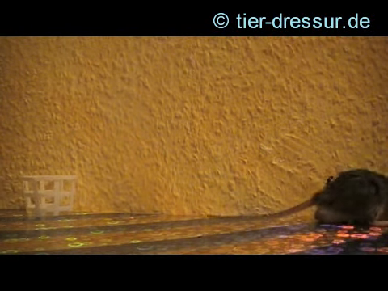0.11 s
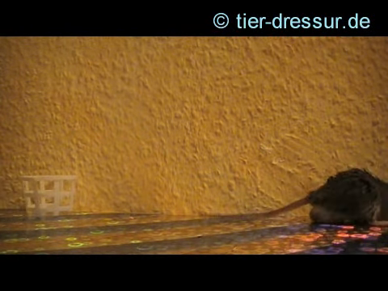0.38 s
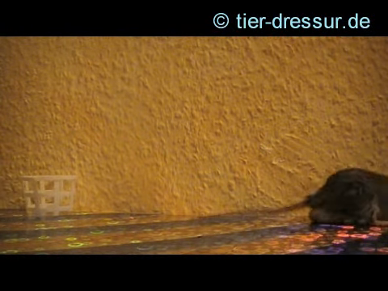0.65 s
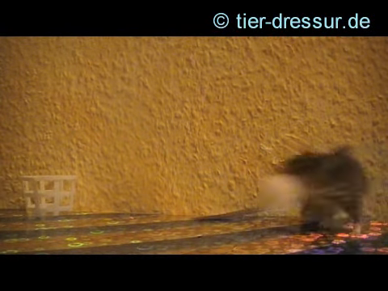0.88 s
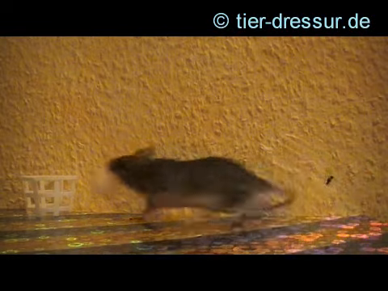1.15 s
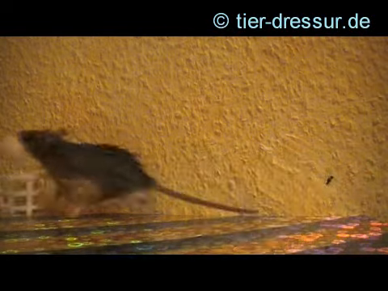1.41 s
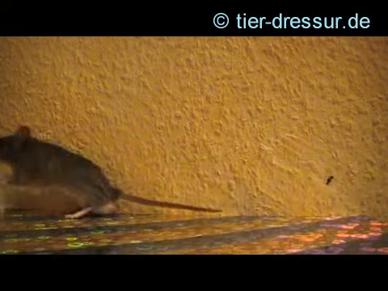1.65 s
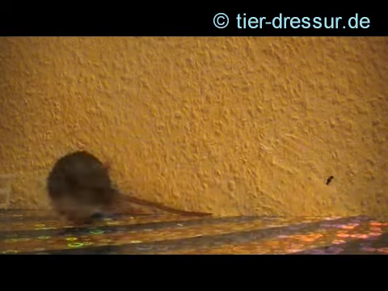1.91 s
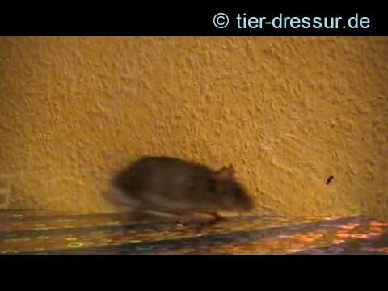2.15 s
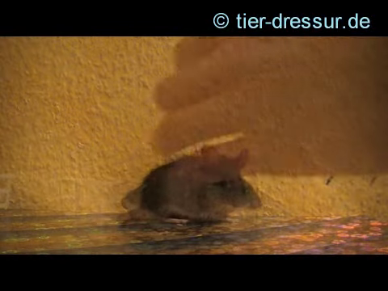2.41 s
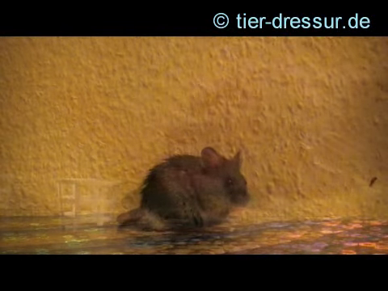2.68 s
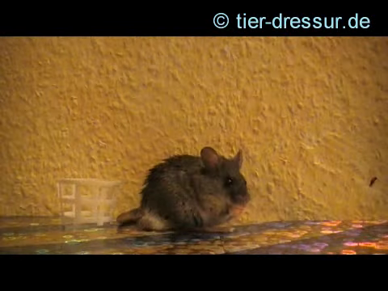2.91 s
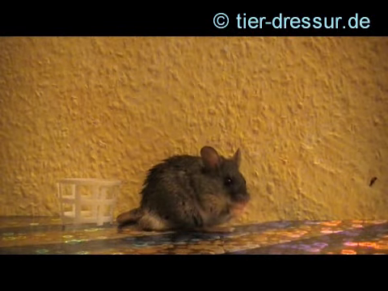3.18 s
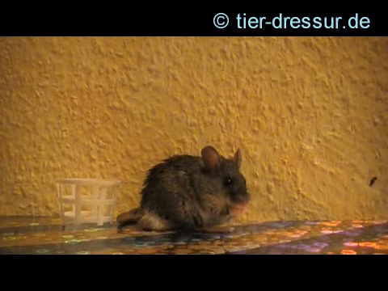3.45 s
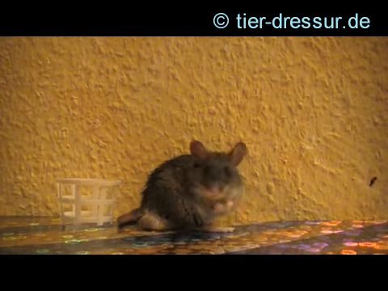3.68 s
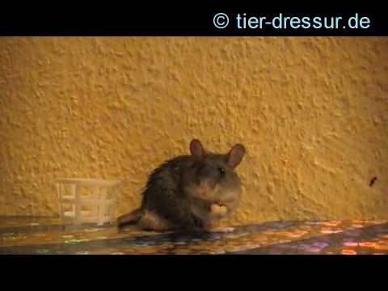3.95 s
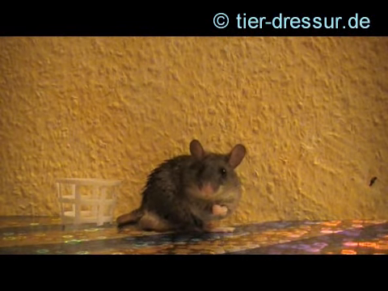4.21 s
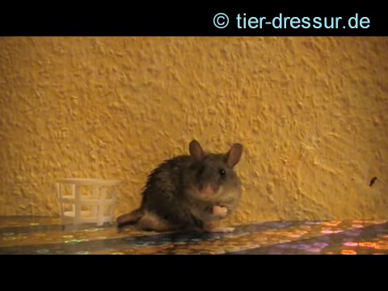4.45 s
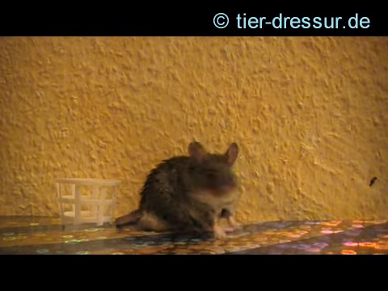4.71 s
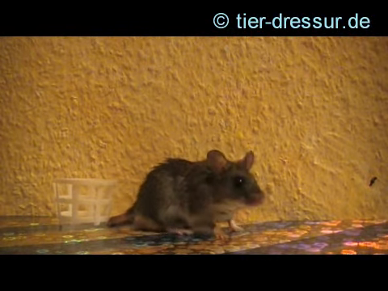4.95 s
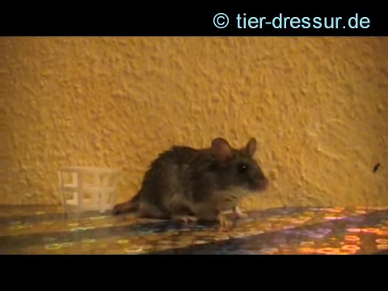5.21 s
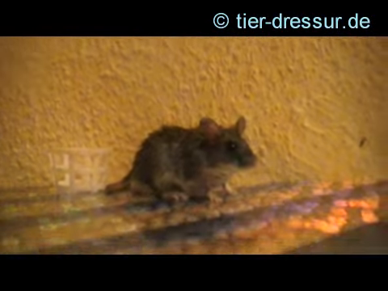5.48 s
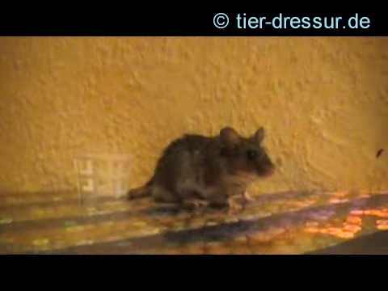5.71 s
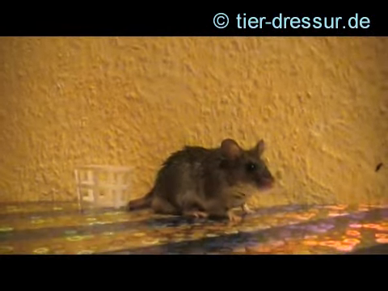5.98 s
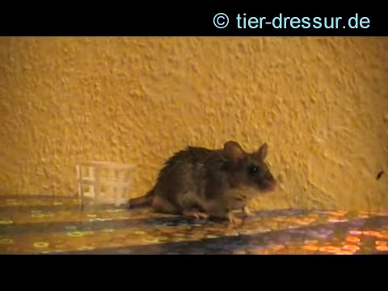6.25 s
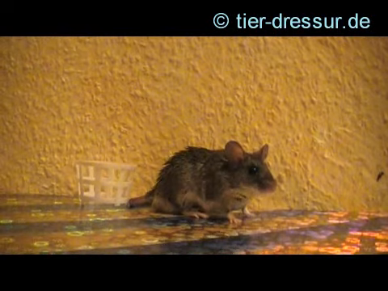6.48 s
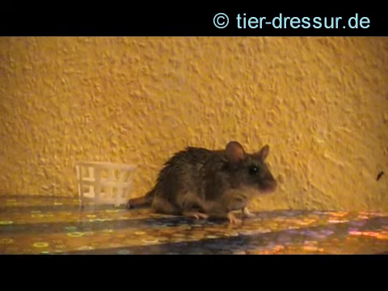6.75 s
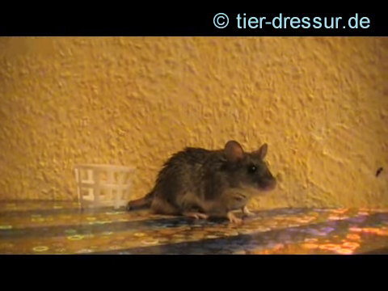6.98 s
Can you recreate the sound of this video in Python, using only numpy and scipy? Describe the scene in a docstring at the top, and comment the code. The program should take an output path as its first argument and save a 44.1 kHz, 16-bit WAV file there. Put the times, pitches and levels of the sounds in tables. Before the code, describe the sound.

A small rodent moves on a wooden table covered with thin plastic. Soft paw taps quicken into a scrabbling run with bright sheet snaps, then two hard knocks as something is set down nearby. Quiet rustles follow, another knock, then a flurry of bumps, scraping and crackling that thins out. Close stereo camera microphone, steady low hiss with faint motor whine, lively hard-walled room.

```python
"""Scurrying over sheet and table

A small animal scurries over a plastic sheet on a wooden table while a person beside it handles things.
Blows ring the table as decaying modes; snaps, rustle, claws and dragging are shaped noise.
A hard-walled room answers with decaying noise; the camera adds hiss and the faint whine of its motor.
"""
import sys
import numpy as np
from scipy import signal
from scipy.fft import rfft, irfft, next_fast_len
from scipy.io import wavfile
from scipy.ndimage import uniform_filter1d, map_coordinates

SR = 44100
rng = np.random.default_rng(int(sys.argv[2]) if len(sys.argv) > 2 else 0)


def volts_from_db(level):
    """Convert decibel levels to linear amplitude ratios."""
    exponent = np.asarray(level, float) / 20
    return 10 ** exponent


def digitize_waveform(pressure):
    """Quantize a signal to 16-bit integers and store it at the path in sys.argv[1].

    Rows of a 2-D input are taken as channels; values are limited to [-1, 1].
    """
    field = np.atleast_2d(pressure).T
    bounded = np.clip(field, -1, 1)
    quanta = np.round(bounded * 32767).astype(np.int16)
    wavfile.write(sys.argv[1], SR, quanta)


N = 313992  # length in samples


def unit(x):
    """Normalisation: x scaled to an rms of 1."""
    return x / np.sqrt(np.mean(x ** 2) + 1e-20)


def along(points, hz):
    """Interpolation of (frequency, value) points on a logarithmic frequency axis."""
    f, v = np.transpose(points)
    return np.interp(np.log(hz + 1), np.log(f + 1), v)


def wobble(rate):
    """Slow random modulation: a smooth curve through normal deviates, rate knots a second."""
    knots = rng.standard_normal(int(N * rate / SR) + 4)
    return map_coordinates(knots, [np.arange(N) * rate / SR])


def filtered(x, response):
    """Linear filtering: the spectrum of x times a response of frequency."""
    m = next_fast_len(x.shape[-1] + 8192)
    spectrum = rfft(x, m) * response(np.fft.rfftfreq(m, 1 / SR))
    return irfft(spectrum, m)[..., :x.shape[-1]]


def band(hz, lo_hz, hi_hz):
    """Band-pass response: gain falls smoothly outside two corner frequencies."""
    return 1 / np.sqrt((1 + (lo_hz / (hz + 1)) ** 6) * (1 + (hz / hi_hz) ** 6))


def paired(two, gain, alike):
    """Interchannel coherence: unrelated signals mixed to a coloured left and right of given likeness."""
    def angle(hz):
        return np.arccos(np.clip(along(alike, hz), -1, 1)) / 2
    mid, side = filtered(two, lambda hz: gain(hz) * [np.cos(angle(hz)), np.sin(angle(hz))])
    return np.array([mid + side, mid - side])


def gestures(rows):
    """Incoherent summation: gesture gains add in power, without and with the last column's dB on top."""
    rise_db, sag_db, fall_db = 13, 6.5, 19.5  # start, end of hold and end, all below the top
    hold_share, edge_s = 0.45, 0.003  # the hold as a share of the fall; the fade at either end
    t, power = np.arange(N) / SR, np.zeros((2, N))
    for s, rise, fall, db, rel_db in rows:
        rise, fall = max(rise, .002), max(fall, .005)
        at = slice(round(s * SR), round((s + rise + fall) * SR))
        u = t[at] - s
        edge = np.clip(np.minimum(u, rise + fall - u) / edge_s, 0, 1)
        corners = [0, rise, rise + hold_share * fall, rise + fall]
        contour_db = np.interp(u, corners, [-rise_db, 0, -sag_db, -fall_db])
        shape = edge * volts_from_db(db + contour_db)
        power[:, at] += (shape * volts_from_db([[0], [rel_db]])) ** 2
    return np.sqrt(power)


def grit(rate, spread_db, smooth):
    """Impulsive noise: steady noise with scattered micro-clicks of random size, rate a second."""
    size = volts_from_db(spread_db * np.minimum(rng.exponential(size=N), 3))
    ticks = (rng.random(N) < rate / SR) * size * rng.standard_normal(N)
    return smooth * rng.standard_normal(N) + np.sqrt(np.clip(1 - smooth ** 2, 0, 1)) * unit(ticks)


def patchy(x, depth_db):
    """Time-frequency modulation: random gain in patches some hundred hertz by a few hundredths of a second."""
    z = signal.stft(x, nperseg=256)[2]
    field = uniform_filter1d(rng.standard_normal(z.shape), size=4, axis=0)
    field = uniform_filter1d(field, size=8, axis=1)
    return signal.istft(z * volts_from_db(depth_db * unit(field)), nperseg=256)[1][:N]


# hiss spectrum, only its shape counts: f/Hz, relative level per hertz/dB
HISS_COLOUR = [(15, -50.5), (25, -30), (59, -5.5), (117, -14), (187, -6), (225, -9), (325, -10),
               (609, -10.5), (731, -11.5), (878, -16.5), (1110, -15), (2930, -26), (3250, -27), (9250, -34),
               (13000, -41.5)]
# correlation of the hiss between left and right: f/Hz, likeness (-1 opposed to 1 equal)
HISS_LIKENESS = [(60, -0.53), (170, -0.63), (510, -0.75), (1490, -0.6), (4340, 0.33), (12600, 0.7)]
# the hiss sinks and swells: t/s, level above the base/dB
HUSH_SWELL = [(0, 5), (2.2, 8), (2.5, 3), (3.0, 4.5), (3.6, 6), (7.1, 6)]
# motor tones: f/Hz, rms level before flutter/dB
MOTOR_TONES = [(150, -74), (541, -78), (721.5, -69), (1083, -79.5), (3220, -82.5)]


def camera_noise():
    """Stationary noise and tones: preamp hiss and room hush, opposed in the bass, under thin motor whine."""
    base_db = -59.5
    t = np.arange(N) / SR
    hiss = unit(paired(rng.standard_normal((2, N)), lambda hz: volts_from_db(along(HISS_COLOUR, hz)), HISS_LIKENESS))
    hiss_db = base_db + np.interp(t, *np.transpose(HUSH_SWELL)) + 0.32 * wobble(0.11)
    whine = np.zeros(N)
    for hz, db in MOTOR_TONES:
        phase = 2 * np.pi * hz * t + .0015 * hz * wobble(25)
        whine += volts_from_db(db + 2 * wobble(8)) * np.sqrt(2) * np.sin(phase)
    return volts_from_db(hiss_db) * hiss + whine


# creases of the sheet popping: t/s, peak level at the source/dB, centre f/Hz, time scale/ms
CREASE_POPS = [(0.0176, -43, 3030, 3.6), (0.6942, -43.5, 7900, 2.5), (0.909, -39.5, 2800, 2.7),
               (1.1364, -44, 3240, 1.9), (1.2817, -24, 7750, 2.5), (1.3259, -33.5, 8490, 1.4),
               (1.3332, -37, 7860, 2.1), (1.518, -28.5, 3140, 0.9), (1.5267, -36, 8900, 0.61),
               (1.552, -34.5, 4940, 0.68), (1.5683, -40, 3070, 3), (1.7138, -32, 8900, 3.7),
               (1.7205, -34.5, 8740, 1.4), (1.7357, -21.5, 8500, 3.7), (1.783, -13, 4840, 10),
               (1.7866, -16.5, 6900, 4.4), (1.7872, -5, 9000, 3), (1.9057, -27, 8830, 1.02),
               (1.942, -28.5, 7900, 2.1), (2.2755, -39, 3840, 1), (2.3035, -43, 4980, 3.4),
               (2.3195, -35, 3830, 0.86), (2.348, -40, 4500, 0.8), (2.3514, -43, 4970, 0.8),
               (2.386, -42, 5360, 1.7), (2.9577, -14, 7340, 0.61), (2.966, -38.5, 5330, 1.1),
               (3.1172, -42.5, 3900, 9.1), (3.1747, -41.5, 2850, 1.5), (3.282, -35, 4290, 0.76),
               (3.3154, -37.5, 2730, 1.2), (3.7791, -36, 3010, 0.95), (4.5419, -43.5, 4370, 2.1),
               (4.5826, -37, 9870, 5.9), (4.7968, -42, 3840, 1.2), (4.864, -44, 4550, 1.4),
               (4.9506, -35.5, 3300, 1.24), (4.9755, -40, 9000, 0.8), (5.0108, -36.5, 8020, 1.3),
               (5.025, -25, 9700, 1.2), (5.0305, -31.5, 3300, 2.3), (5.1205, -36.5, 7000, 1.3),
               (5.1349, -32, 6350, 1.172), (5.1627, -31, 3630, 3.5), (5.1757, -31, 3640, 3.9),
               (5.2005, -37, 4000, 5.4), (5.2462, -38.5, 5170, 11), (5.2575, -25, 4180, 1.1),
               (5.2911, -36.5, 2950, 2.3), (5.315, -6, 5580, 1.9), (5.3142, -10.5, 3318, 4.3),
               (5.3735, -12, 5100, 1.6), (5.3771, -18.5, 3283, 2.5), (5.4113, -19, 2300, 3.9),
               (5.433, -25, 3000, 5.8), (5.586, -32.5, 8665, 0.79), (5.742, -44.5, 2920, 3),
               (5.8449, -38.5, 4860, 3.5), (5.853, -36.5, 3540, 2.3), (6.1942, -43.5, 3160, 2.4),
               (6.204, -37, 10440, 2.2), (6.987, -47, 9200, 5.1)]


def snaps():
    """Impulsive buckling: a popping crease is a quick noise burst, strongest round its own centre."""
    crack_db, crack_db_ms = -17, 14  # broad crack re centre: dB + dB ms / time scale, quicker is broader
    out, t = np.zeros(N + SR), np.arange(2048) / SR
    for s, db, centre_hz, ms in CREASE_POPS:
        crack = volts_from_db(crack_db + crack_db_ms / ms)

        def colour(hz):
            peak = 1 / (1 + (np.log((hz + 1) / centre_hz) / .21) ** 4)
            return band(hz, .36 * centre_hz, 11000) * (crack + peak)
        u = t * 1000 / ms
        burst = filtered(rng.standard_normal(len(t)), colour) * u * np.exp(-2.2 * u)
        out[round(s * SR):][:len(t)] += volts_from_db(db) * burst / np.abs(burst).max()
    return out[:N]


# modes of the table top: f/Hz, relative level/dB, t60/s
TABLE_MODES = [(91.8, 20, 0.033), (157.8, -6.5, 0.11), (192.4, -10, 0.37), (238.6, 7.5, 0.044),
               (317, 15, 0.02), (365.8, -3.5, 0.16), (420, 7.5, 0.025), (520, 21.5, 0.01),
               (580, -6.5, 0.21), (658.5, 2.5, 0.044), (770.3, 14.5, 0.023), (856, -8, 0.26),
               (1130, -11.5, 0.065), (1458, 10.5, 0.0079), (1670, 7.5, 0.011), (1883, 4.5, 0.017),
               (2230, -6, 0.053), (2173, -0.5, 0.013), (2360, -7.5, 0.0044), (3260, 0, 0.03)]


def ring_table(blows):
    """Modal synthesis: each blow rings low, middle and high modes, each group round a centre of its own."""
    contact_cycles = 0.94  # time constant of a blow's build-up, in cycles of its centre
    rattle_db, rattle_rad = 3, 1.3  # loose sheet and things on top unsettle level and phase, less below 500 Hz
    out, t = np.zeros(N + SR), np.arange(SR // 2) / SR
    hz, level, t60 = np.transpose(TABLE_MODES)[:, :, None]
    group = np.digitize(hz[:, 0], [170, 1000])
    fade = volts_from_db(level - 60 * t / t60)
    loose = np.minimum(hz / 500, 1)
    glide = np.clip(1 - np.abs(t * 120 - np.arange(1, 61)[:, None]), 0, 1)  # joins 120 knots a second
    for s, db, knock_hz, rap_db, thud_db, rap_hz in blows:
        spot, load = rng.standard_normal((2, len(hz)))
        shake, slip = rng.standard_normal((2, len(hz), 60))
        shaken = volts_from_db(rattle_db * loose * shake @ glide)
        slipped = rattle_rad * np.cumsum(slip, 1) @ glide
        detuned_hz = hz * (1 + .015 * load[:, None])  # what rests on the top detunes it
        modes = fade * shaken * np.sin(2 * np.pi * detuned_hz * t + slipped * loose)
        for g, (rel_db, centre_hz) in enumerate([(thud_db, 88), (0, knock_hz), (rap_db, rap_hz)]):
            reach_db = -34 * np.log(hz[:, 0] / centre_hz) ** 2
            # every spot on the wood stirs the modes differently
            ring = volts_from_db(reach_db + 1.5 * spot)[:, None] * modes
            swell = 1 - np.exp(-t * centre_hz / contact_cycles)
            # a free board radiates no slow push, and a soft contact no sharp edge
            edges_hz = [0.44 * centre_hz, 1.83 * centre_hz]
            contact = signal.butter(3, edges_hz, "band", fs=SR, output="sos")
            part = signal.sosfilt(contact, swell * ring[group == g].sum(0))
            out[round(s * SR):][:len(t)] += volts_from_db(db + rel_db) * part / np.abs(part).max()
    return out[:N]


def wood_response(hz, width_hz):
    """Resonance: the table's modes as a sum of band-pass resonators of one common bandwidth."""
    total = 0
    for mode_hz, db, _ in TABLE_MODES:
        loss = 1j * hz * width_hz
        total = total + volts_from_db(db) * loss / (mode_hz * mode_hz - hz * hz + loss)
    return total


# paws landing on the table: t/s, knock peak level at the source/dB, knock centre f/Hz, rap re knock level/dB
PAW_STEPS = [(0.0204, -31.5, 424, -3.5), (0.8065, -31, 660, -4.5), (0.91, -47.5, 343, 11),
             (1.0249, -43.5, 650, -6), (1.067, -50, 390, 11.5), (1.1363, -28.5, 530, -9),
             (1.223, -45.5, 580, 2.5), (1.2497, -40, 570, -3.5), (1.2806, -33, 630, 8),
             (1.303, -42.5, 500, -6.5), (1.316, -39, 600, -5), (1.354, -35, 550, -2),
             (1.3843, -25, 550, -5.5), (1.3921, -20, 570, 1), (1.4211, -28.5, 520, 3.5),
             (1.433, -38.5, 450, -3.5), (1.445, -39.5, 400, -1.5), (1.516, -30, 513, 0),
             (1.522, -24.5, 480, -8.5), (1.5429, -24, 594, -4), (1.5524, -17.5, 570, 0),
             (1.568, -31, 520, -8), (1.581, -34, 480, -10), (1.593, -30.5, 480, -13.5),
             (1.687, -38.5, 420, -13.5), (1.7133, -33.5, 470, 3), (1.7352, -11, 522, -8.5),
             (1.7959, -29, 520, 12), (1.845, -13.5, 556, 9), (1.9086, -19, 500, -2.5),
             (1.9413, -25, 480, -15.5), (1.962, -31, 520, -12), (2.0611, -31, 580, -5),
             (2.2165, -31.5, 568, -10.5), (2.252, -39.5, 526, -4.5), (2.2797, -35.5, 696, -3.5)]


def footsteps():
    """Modal excitation by a light body: paws hardly stir the lowest modes."""
    thud_db, rap_hz = -36.5, 1480  # thud re knock
    return ring_table([(*row, thud_db, rap_hz) for row in PAW_STEPS])


# the sheet sliding: start t/s, rise t/s, fall t/s, top level before flutter/dB, lower body re rustle level/dB
SHEET_STROKES = [(0.62, 0.15, 0.012, -60, -5.5), (1.284, 0.0047, 0.083, -56.5, 7),
                 (1.7, 0.0096, 0.022, -51.5, -9), (4.04, 0.013, 0.02, -56, -1),
                 (4.073, 0.0042, .055, -42, 1.5), (4.272, 0.0029, 0.074, -53, 1.5),
                 (4.33, 0.12, 0.19, -53.5, -6.5), (4.45, 0.15, 0.23, -52.5, -6.5),
                 (4.87, 0.072, 0.131, -56.5, -15), (5.02, 0.0091, 0.026, -49, 5),
                 (5.115, 0.0096, 0.027, -49, -1), (5.15, 0.024, 0.12, -52, 5.5),
                 (5.22, 0.044, 0.066, -45.5, -2), (5.44, 0.11, 0.096, -48.5, 1.5),
                 (5.53, 0.087, 0.091, -53, -2.5), (5.98, 0.12, 0.1355, -54, -0.5),
                 (6.556, 0.006, 0.077, -50.5, -0.5), (6.585, 0.015, 0.05, -51, -2.5),
                 (6.69, 0.028, 0.096, -66, 3.5), (6.82, 0.0066, 0.013, -56.5, 4),
                 (6.982, 0.0082, 0.015, -48.5, -5), (7.01, 0.037, 0.072, -53.5, -4)]
# colour of the sliding sheet, only its shape counts: f/Hz, relative level per hertz/dB
SHEET_COLOUR = [(590, -7), (1000, 1), (1770, -15.5), (2330, -18), (4440, -8.5), (8280, -5.5), (9320, -5.5),
                (11900, -5.5), (12600, -12.5), (13000, -16.5)]


def rustle():
    """Crackling noise: countless tiny creases give way in uneven clumps; the air below hums near 1.8 kHz."""
    top, body = gestures(SHEET_STROKES) * volts_from_db(1.5 * np.array([wobble(70), wobble(60)]))
    creases = patchy(grit(500, spread_db=3.5, smooth=.86), depth_db=2.5)
    slide = filtered(creases, lambda hz: volts_from_db(along(SHEET_COLOUR, hz)))

    def body_band(hz):
        air_hum = 1 + 1.1 / (1 + ((hz - 1800) / 150) ** 2)
        return band(hz, 1500, 3200) ** 2 * air_hum
    upper = unit(filtered(slide, lambda hz: band(hz, 3900, 11000)))
    lower = unit(filtered(slide, body_band))
    return top * upper + body * lower


# claws scrabbling for grip: start t/s, rise t/s, fall t/s, top level before flutter/dB, upper re lower level/dB
CLAW_SCRABBLES = [(1.28, 0.037, 0.029, -42.5, -15), (1.39, 0.0039, 0.088, -38.5, 1.5),
                  (1.54, 0.021, 0.068, -39.5, -5.5), (6.05, 0.044, 0.028, -52.5, 4.5)]


def scrabble():
    """Resonant filtering: quick uneven claw ticks excite the middle modes and leave the lowest at rest."""
    lower, upper = gestures(CLAW_SCRABBLES) * volts_from_db(3 * np.array([wobble(60), wobble(90)]))
    ticks = filtered(grit(250, spread_db=2.5, smooth=.7), lambda hz: wood_response(hz, 120))
    low_ticks = unit(filtered(ticks, lambda hz: band(hz, 140, 1400)))
    high_ticks = unit(filtered(ticks, lambda hz: band(hz, 1200, 1500)))
    return lower * low_ticks + upper * high_ticks


# blows felt through the camera's stand: t/s, peak level at the source/dB
STAND_JOLTS = [(1.5528, -31), (1.845, -24), (2.957, -17)]


def jolts():
    """Structure-borne transmission: a hard blow shoves the microphone once, a single low push."""
    push_ms = 1.9
    out, t = np.zeros(N + SR), np.arange(512) / SR
    push = np.sin(np.pi * np.minimum(t * 1000 / push_ms, 1)) ** 2
    for s, db in STAND_JOLTS:
        out[round(s * SR):][:len(t)] += volts_from_db(db) * push
    return out[:N]


# things set down or bumped by hand: t/s, knock peak level at the source/dB, knock centre f/Hz,
# rap re knock level/dB, thud re knock level/dB
HAND_KNOCKS = [(2.9559, -8.5, 832, -19, -20.5), (2.9566, -2.5, 520, -37, -43),
               (3.1191, -8, 281, -23, -18.5), (3.7777, -50.5, 630, 4.5, -29),
               (4.275, -38.5, 500, -3, -18.5), (4.2886, -14.5, 636, -21, -29), (4.2918, -12, 357, -36, -15),
               (4.8048, -34.5, 520, -10.5, -78), (4.8494, -40.5, 550, -12.5, -18),
               (4.8989, -37.5, 249, -1.5, -9), (5.065, -50, 630, 13, -33), (5.131, -35.5, 520, -18, -24),
               (5.1596, -27.5, 364, -1.5, -28), (5.169, -27.5, 525, -24, -51), (5.199, -37.5, 390, 1.5, -5),
               (5.238, -30.5, 467, 3, -2.5), (5.258, -24.5, 657, -8, -40.5), (5.272, -26.5, 620, -12, -27),
               (5.292, -20.5, 635, -22.5, -18), (5.3147, -15, 360, 7, -19), (5.3757, -17, 357, 10.5, -10.5),
               (5.4113, -23, 345, -5, -20), (5.4255, -31, 690, 6.5, -27), (5.434, -27, 800, 8.5, -20),
               (5.44, -19, 364, -17, -13), (5.5316, -22.5, 420, -22, -1.5), (5.5686, -30, 607, -20, -34),
               (5.594, -36.5, 595, -13, -16), (5.8466, -26.5, 442, 5, -9), (5.853, -25, 620, -8, 4.5),
               (6.055, -33, 590, 1, -8), (6.069, -50, 506, 13, -9), (6.085, -58, 560, 3, -4.5),
               (6.1, -45, 583, 9, -17), (6.9266, -42, 329, -4.5, -2.5), (6.9942, -40, 436, -17, -3.5)]


def hand_knocks():
    """Contact stiffening: a louder rap is a harder contact and rings higher."""
    rap_hz, rap_hz_per_db, rap_from_db = 1800, 36, -22
    blows = []
    for s, db, knock_hz, rap_db, thud_db in HAND_KNOCKS:
        excess_db = max(db + rap_db - rap_from_db, 0)
        blows.append((s, db, knock_hz, rap_db, thud_db, rap_hz + rap_hz_per_db * excess_db))
    return ring_table(blows)


# something dragged over the wood: start t/s, rise t/s, fall t/s, top level before flutter/dB,
# scratch re scrape level/dB
WOOD_DRAGS = [(5.235, 0.033, 0.053, -39, -17), (5.42, 0.011, 0.03, -40.5, 5.5),
              (4.87, 0.042, 1, -56.5, -4.5), (5.1, 0.16, 0.24, -45.5, -9.5),
              (5.34, 0.035, 0.18, -39.5, 8.5), (5.56, 0.18, 0.05, -58, -3),
              (5.99, 0.072, 0.078, -51.5, -17), (6.87, 0.068, 0.049, -53.5, -8.5),
              (7.0, 0.026, 0.097, -58, -6)]
# colour of the dry scratch, only its shape counts: f/Hz, relative level per hertz/dB
SCRATCH_COLOUR = [(1200, -29), (1700, -2), (2250, 3.5), (2800, -5), (3300, 2), (4300, -10), (5200, -8.5),
                  (8000, -16), (12000, -25.5)]


def drags():
    """Stick-slip friction: grit feeds table resonances widened by the weight on it, a dry scratch above."""
    thud_rel_db = -1
    flutter_db = np.array([3 * wobble(35), 3 * wobble(20), 1.5 * wobble(80)])
    scrape, thud, scratch = gestures(WOOD_DRAGS)[[0, 0, 1]] * volts_from_db(flutter_db)
    rub = filtered(grit(350, spread_db=3.5, smooth=0.7), lambda hz: wood_response(hz, 90))
    high = unit(filtered(rub, lambda hz: band(hz, 175, 1700)))
    low = unit(filtered(rub, lambda hz: band(hz, 112, 175)))
    dry_grit = patchy(grit(900, spread_db=2, smooth=.8), depth_db=1.5)
    dry_scratch = unit(filtered(dry_grit, lambda hz: volts_from_db(along(SCRATCH_COLOUR, hz))))
    return scrape * high + volts_from_db(thud_rel_db) * thud * low + scratch * dry_scratch


# where the action is: t/s, left-right level difference of the wood/dB, of the sheet/dB,
# level sent to the room by the sheet/dB, by the wood/dB (farther is wetter)
ACTION_BEARING = [(0, -4.5, 0.5, -2.5, -0.5), (1.3, -0.5, -3, 2, -3), (1.76, 2, 1, 3, -3),
                  (2.297, -3.5, 10.5, 3.5, -2), (2.94, -5.5, -21.5, -11, 2), (3.2, -7, 1, 0, -7.5),
                  (4.0, 1, -4, -1, -4.5), (5.0, -8.5, 1.5, -9.5, -4.5), (5.601, -2, 0, 3.5, -1.5),
                  (5.849, -5.5, 4.5, 5, -4.5), (6.3, -5, 2.5, -9.5, -7), (7.1, -1, -3, 3, 3)]


def bearing():
    """Source motion: the four level columns in dB, interpolated over time."""
    s, *columns = np.transpose(ACTION_BEARING)
    return [np.interp(np.arange(N) / SR, s, db) for db in columns]


# reverberation time: f/Hz, t60/s
ROOM_T60 = [(100, 0.34), (400, 0.56), (1000, 0.67), (2500, 0.4), (6000, 0.5), (11000, 0.27)]
# colour of the echo for a source at 0 dB into the room: f/Hz, level/dB
ROOM_COLOUR = [(100, -1), (500, -10.5), (2000, -7), (8000, -13.5)]
# correlation of the echo between left and right: f/Hz, likeness
ROOM_LIKENESS = [(100, 0.7), (300, 1), (600, 0.7), (1200, 0.91), (2700, 0.16), (6000, 1)]


def room(x):
    """Diffuse reverberation: each frequency dies at its own speed; a fresh random tail every quarter second."""
    step, out = SR // 4, np.zeros((2, N + 2 * SR))
    for start in range(0, N, step):
        hz, t, z = signal.stft(rng.standard_normal((2, SR * 3 // 4)), SR, nperseg=256)
        t60 = along(ROOM_T60, hz)[:, None]
        onset = np.clip(t / 0.011, 0, 1)
        fade = volts_from_db(-60 * t / t60) / np.sqrt(t60) * onset
        tail = signal.istft(z * fade, SR, nperseg=256)[1]
        tail = tail / np.linalg.norm(tail[0])
        tail = paired(tail, lambda f: volts_from_db(along(ROOM_COLOUR, f)), ROOM_LIKENESS)
        wet = signal.fftconvolve(x[None, start:start + step], tail, axes=1)
        out[:, start:start + wet.shape[1]] += wet
    return out[:, :N]


# echoes from beside the camera, opposed in the two ports: delay t/ms, level/dB
WALL_ECHOES = [(2.1, -14.5), (3.7, -19.5), (6.3, -28.5)]


def placed(wood, sheet):
    """Level difference and early reflection: the camera body shades the far port; a near wall adds width."""
    wood_db, sheet_db, *_ = bearing()
    both = wood + sheet
    wall = sum(volts_from_db(db) * np.roll(both, round(ms * SR / 1000)) for ms, db in WALL_ECHOES)
    ports = []
    for sign in (1, -1):
        direct = volts_from_db(sign * wood_db / 2) * wood + volts_from_db(sign * sheet_db / 2) * sheet
        ports.append(direct + sign * wall)
    return np.array(ports)


def scene():
    """Superposition: table and sheet, their echo in the room, and the camera's own noise."""
    noise = camera_noise()
    sheet = snaps() + rustle()
    wood = footsteps() + scrabble() + hand_knocks() + drags()
    *_, sheet_wet_db, wood_wet_db = bearing()
    echo = room(volts_from_db(wood_wet_db) * wood + volts_from_db(sheet_wet_db) * sheet)
    echo = volts_from_db([[-1.1], [1.1]]) * echo  # stronger on the right
    return placed(wood + jolts(), sheet) + echo + noise  # the jolts raise no room echo


def low_pass(x):
    """Removes everything above the highest recorded frequency."""
    return signal.sosfilt(signal.butter(12, 13240, fs=SR, output="sos"), x)


def record(dry):
    """Band limiting, level-dependent treble width and saturation: the input stage rounds the tallest peaks."""
    top_hz, bass_hz = 11830, 32
    width_hz, width_db = 4000, -49.5  # above this pitch left-right difference stays only where this loud
    peak_limit = 1.05
    heard = filtered(dry, lambda hz: 1 / (1 + (hz / top_hz) ** 40))
    heard = signal.sosfilt(signal.butter(2, bass_hz, "high", fs=SR, output="sos"), heard)
    side = filtered((heard[0] - heard[1]) / 2, lambda hz: hz > width_hz)
    power = np.abs(uniform_filter1d(side ** 2, size=512))
    quiet_side = side / (1 + (power / volts_from_db(2 * width_db)) ** 2)
    heard = heard - np.outer([1, -1], quiet_side)
    rounded = heard / (1 + np.abs(heard / peak_limit) ** 6) ** (1 / 6)
    return low_pass(rounded)


dry = scene()
out = record(dry)
digitize_waveform(out)
```